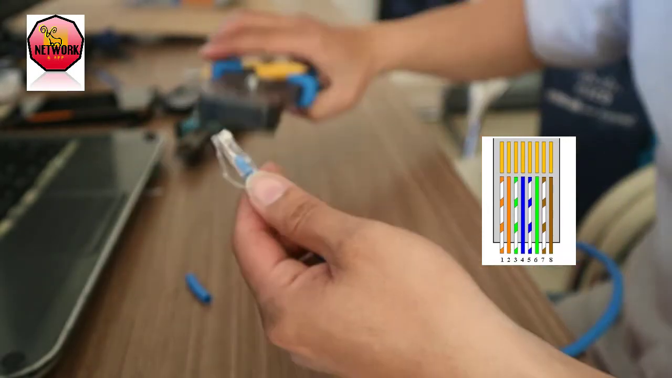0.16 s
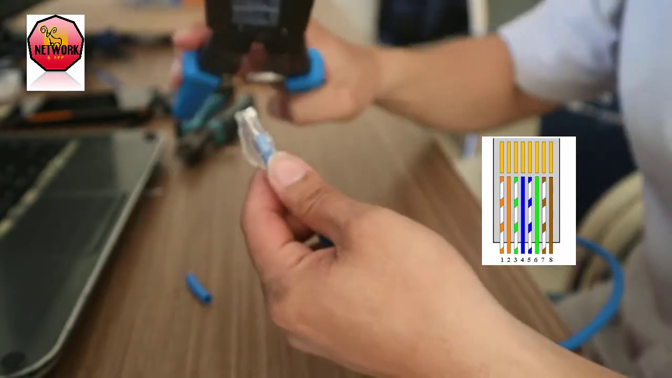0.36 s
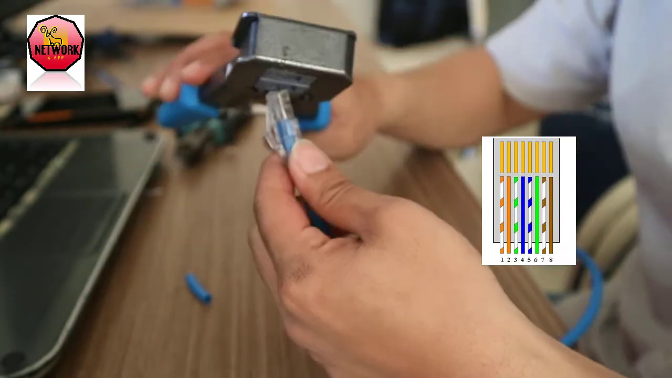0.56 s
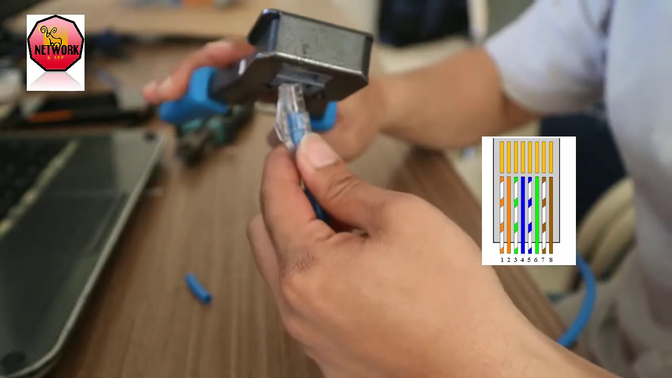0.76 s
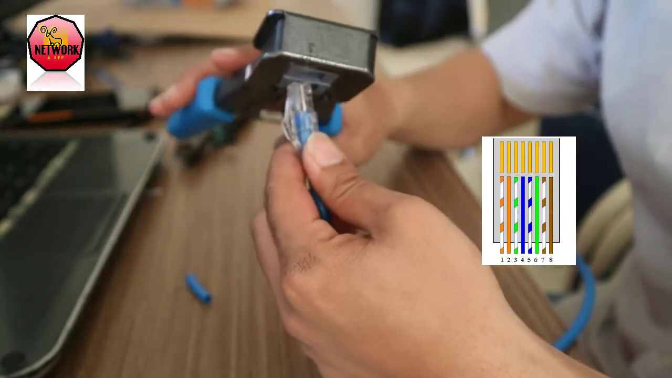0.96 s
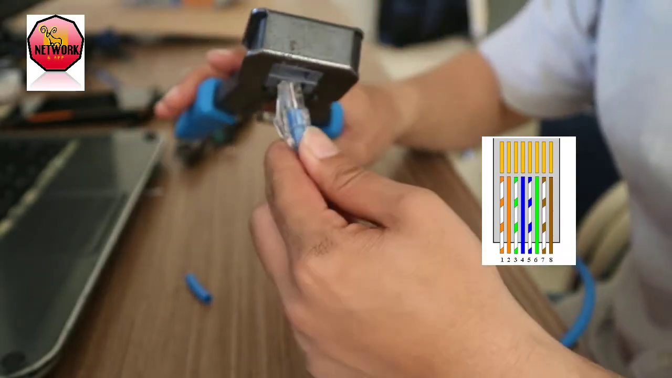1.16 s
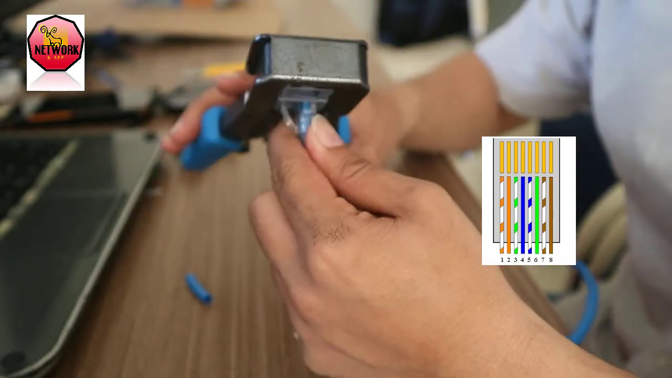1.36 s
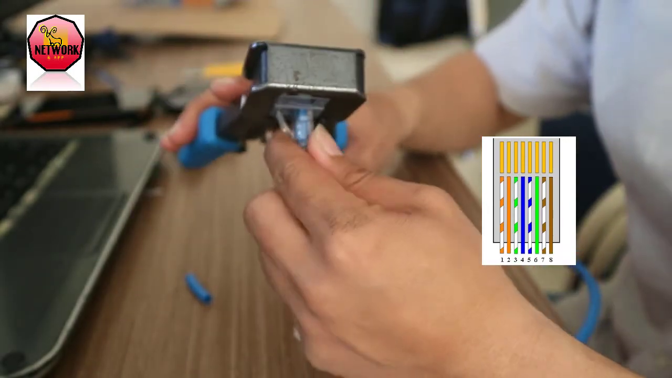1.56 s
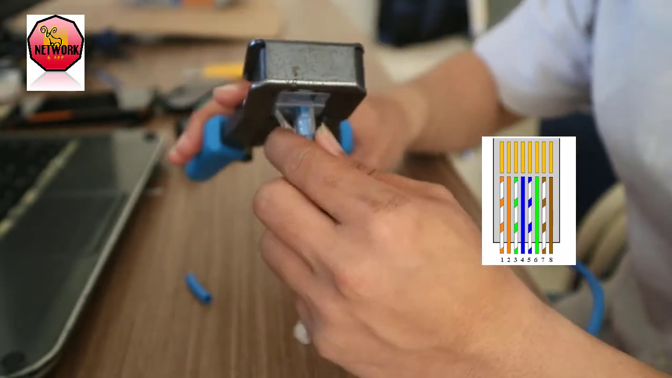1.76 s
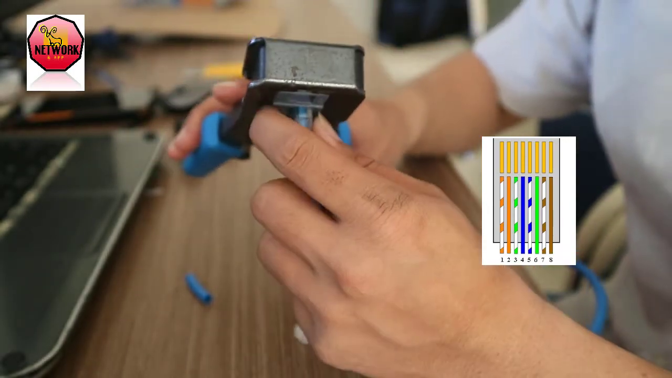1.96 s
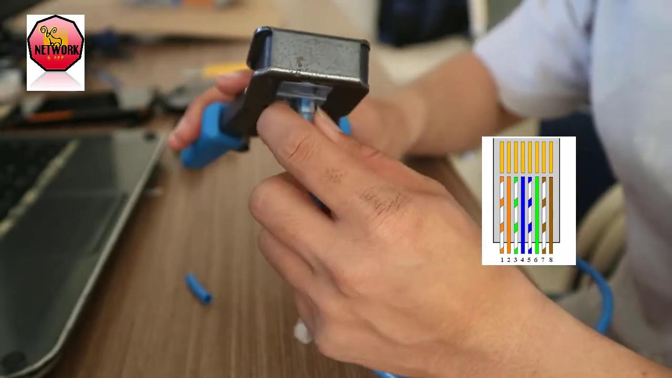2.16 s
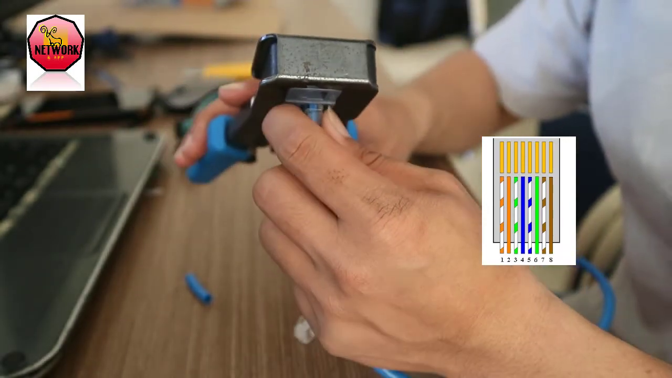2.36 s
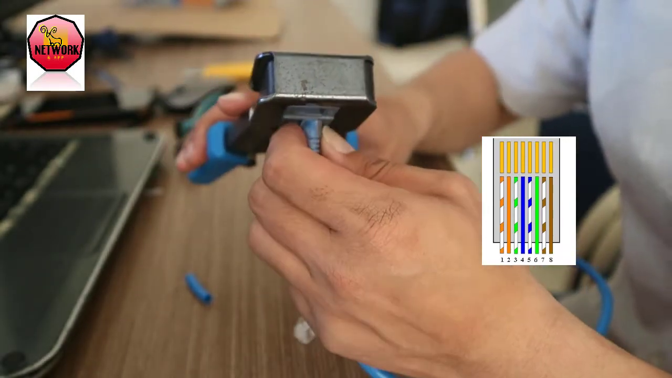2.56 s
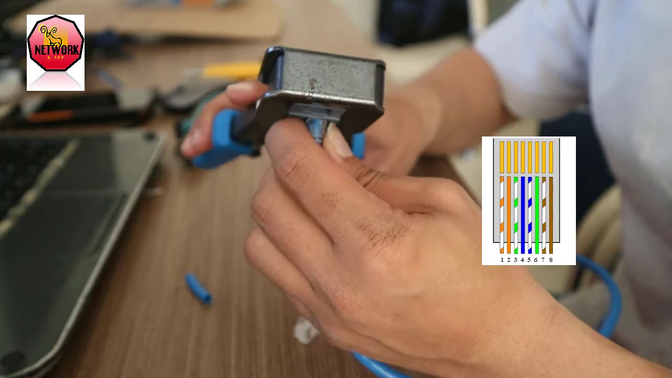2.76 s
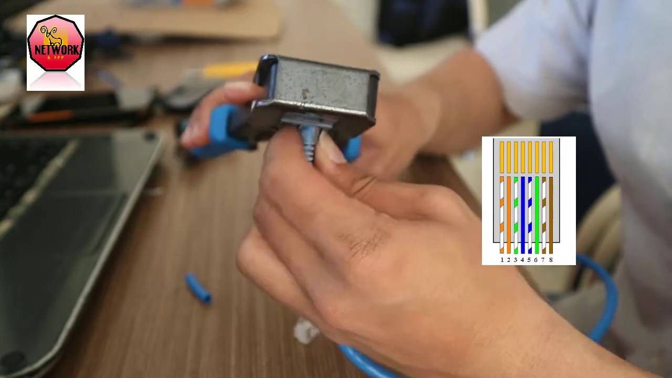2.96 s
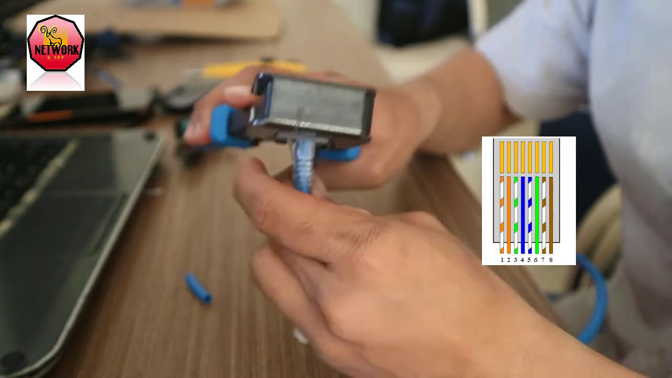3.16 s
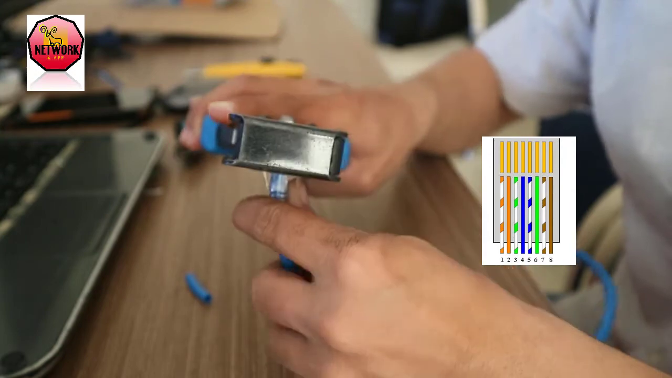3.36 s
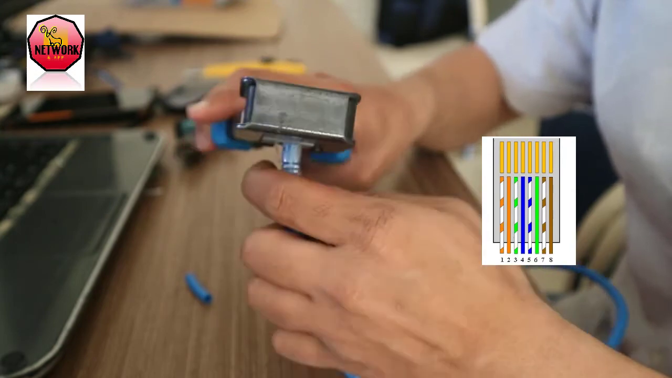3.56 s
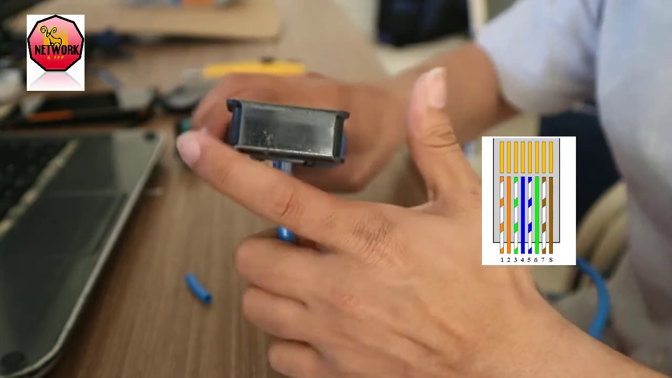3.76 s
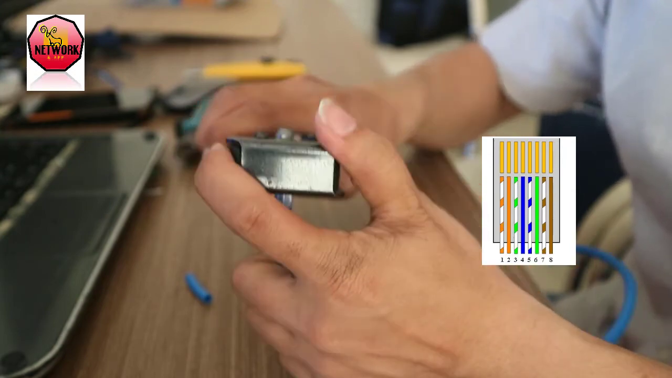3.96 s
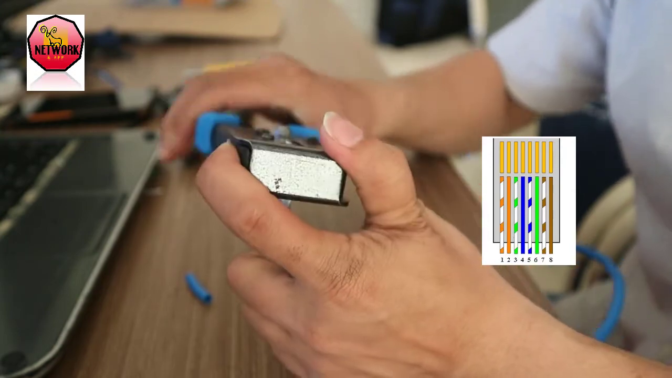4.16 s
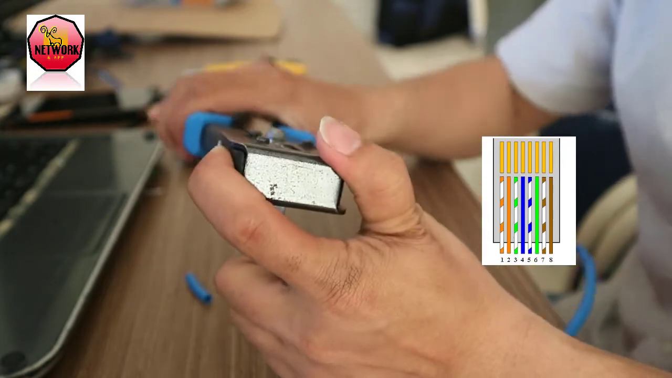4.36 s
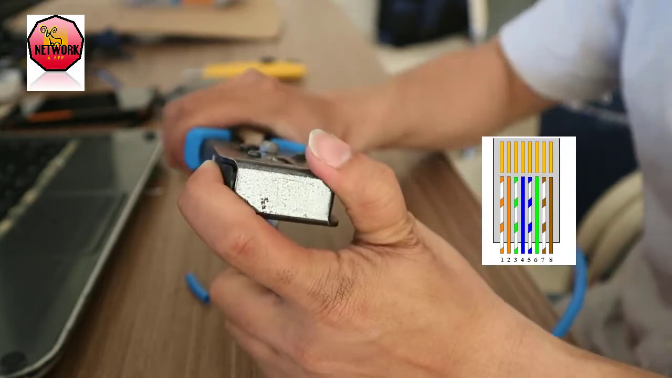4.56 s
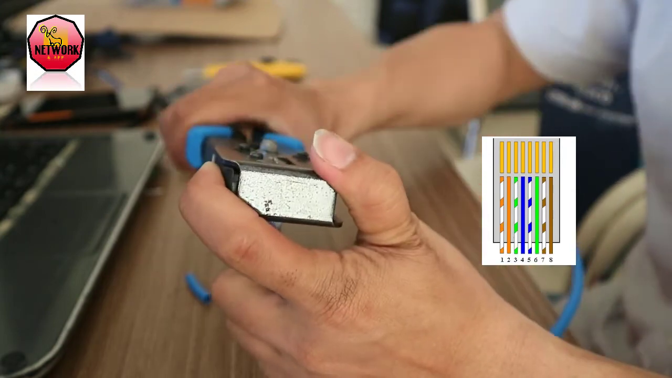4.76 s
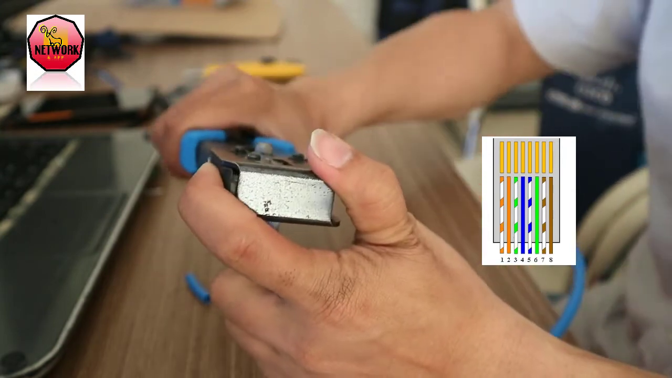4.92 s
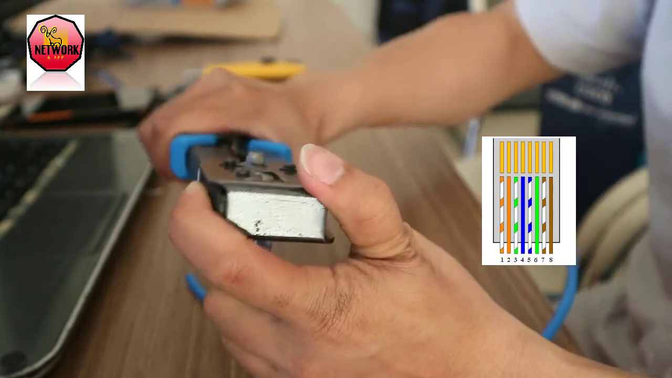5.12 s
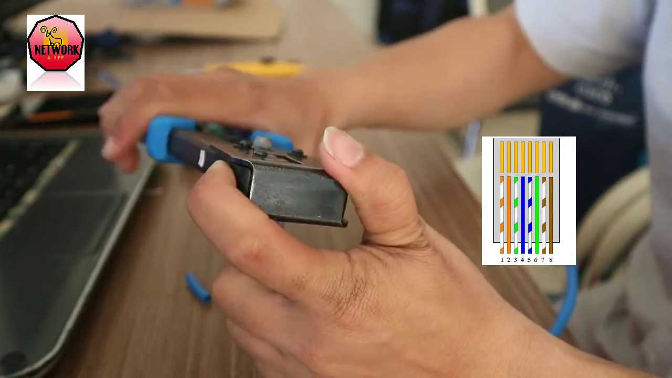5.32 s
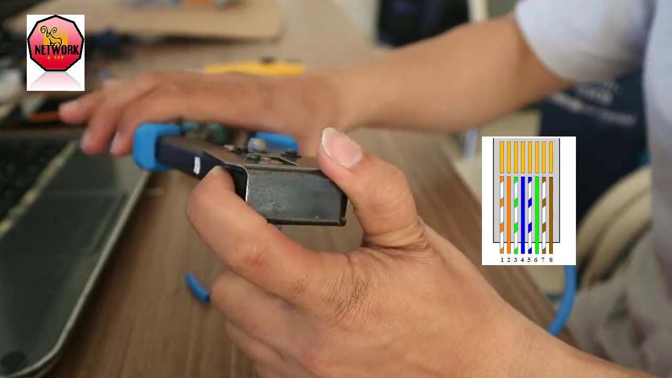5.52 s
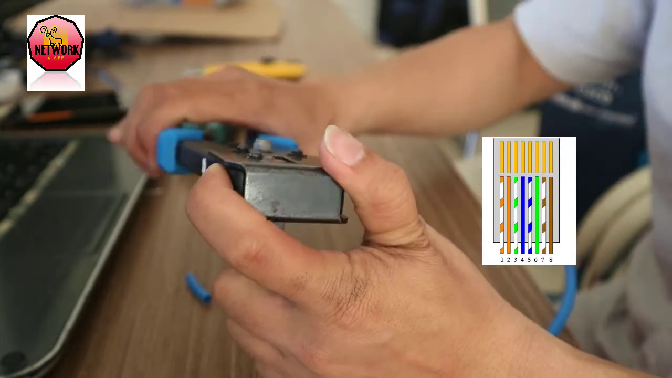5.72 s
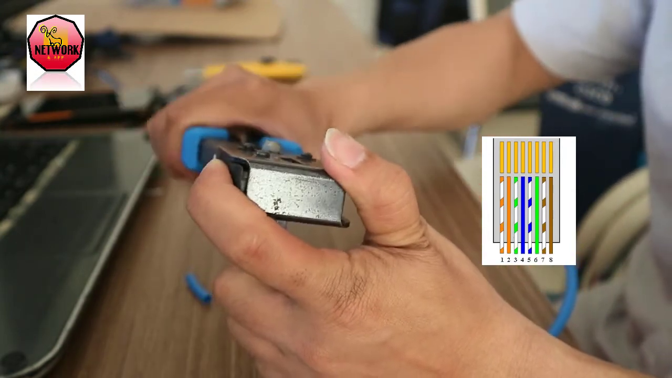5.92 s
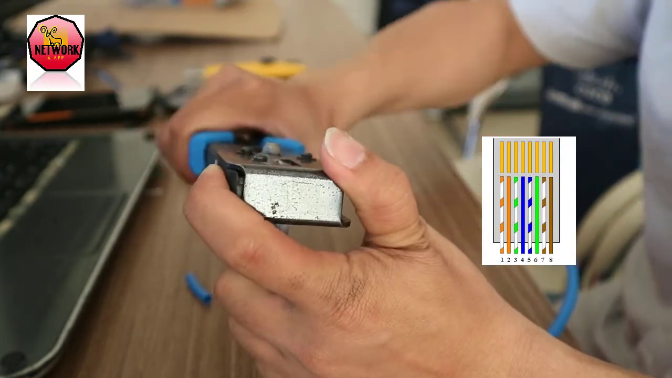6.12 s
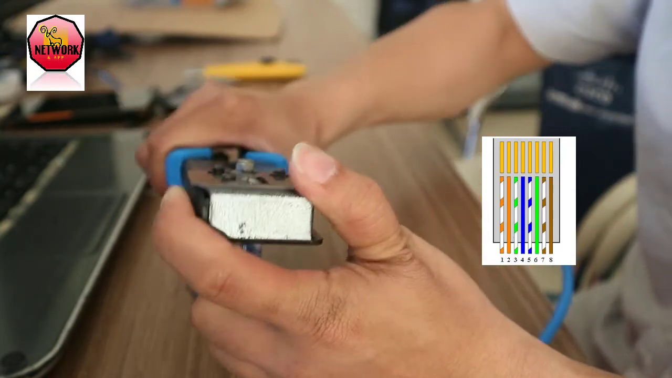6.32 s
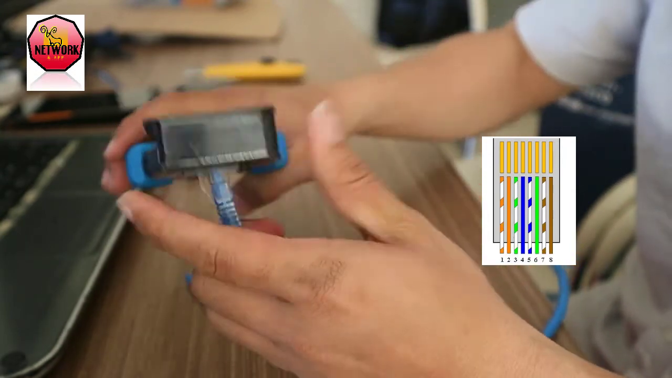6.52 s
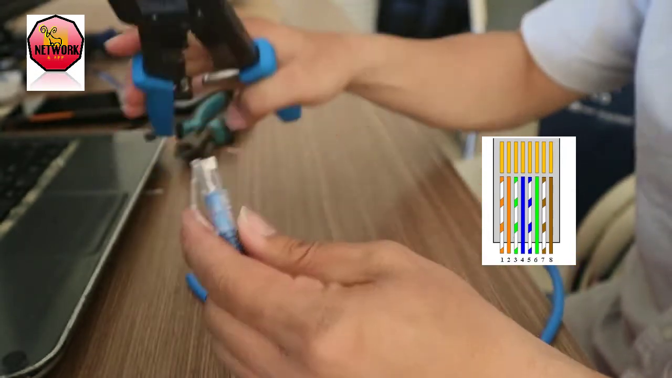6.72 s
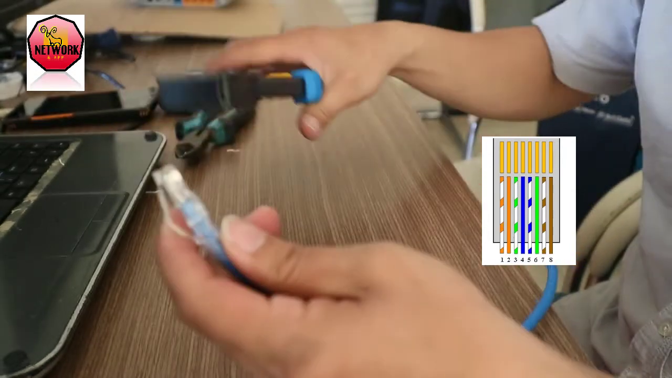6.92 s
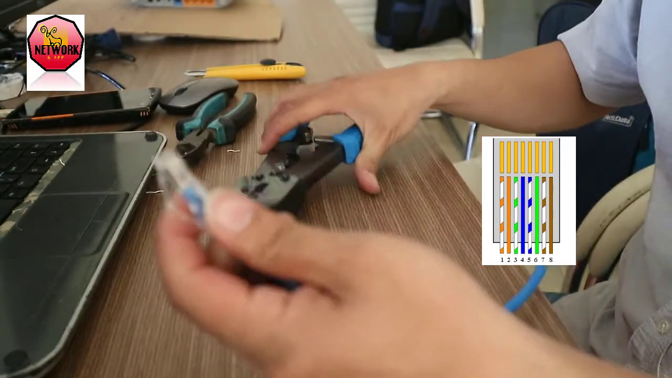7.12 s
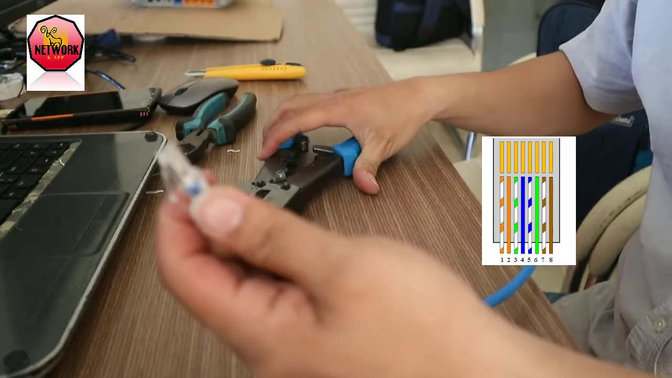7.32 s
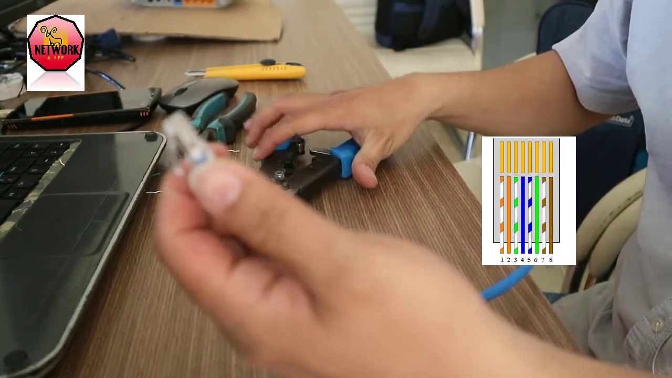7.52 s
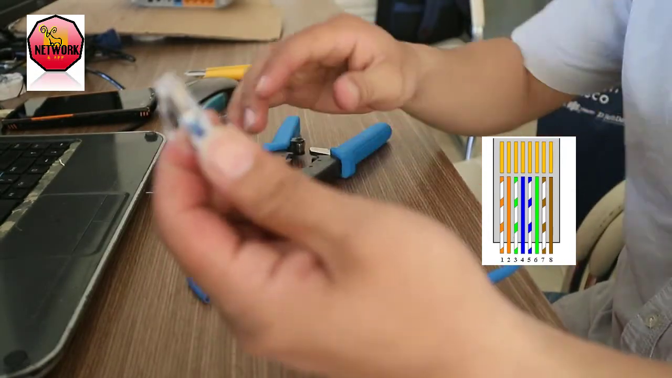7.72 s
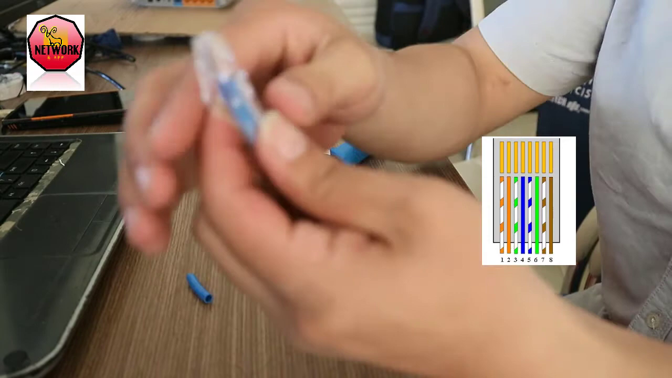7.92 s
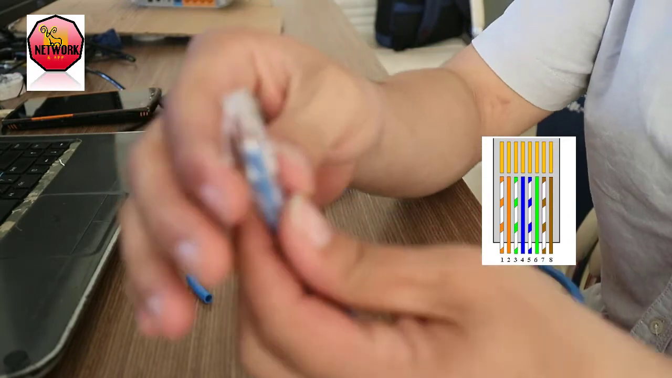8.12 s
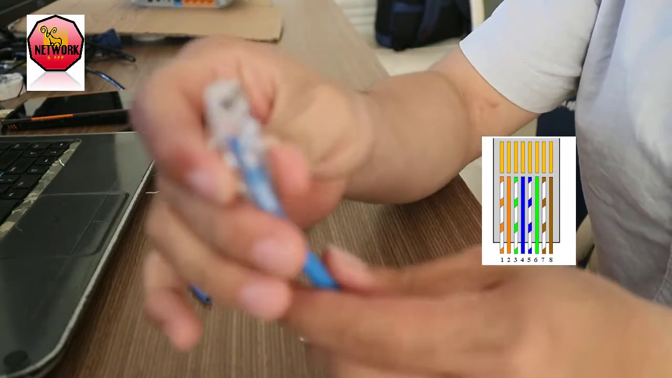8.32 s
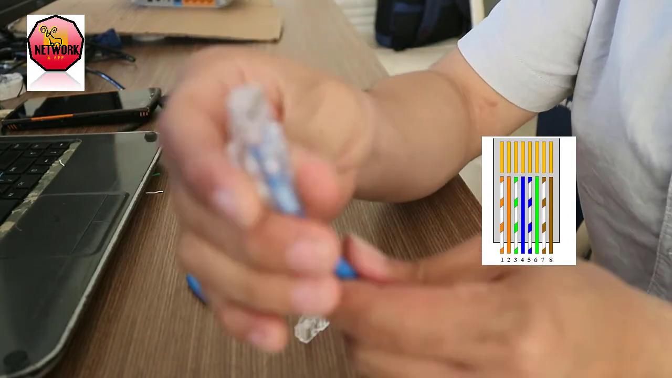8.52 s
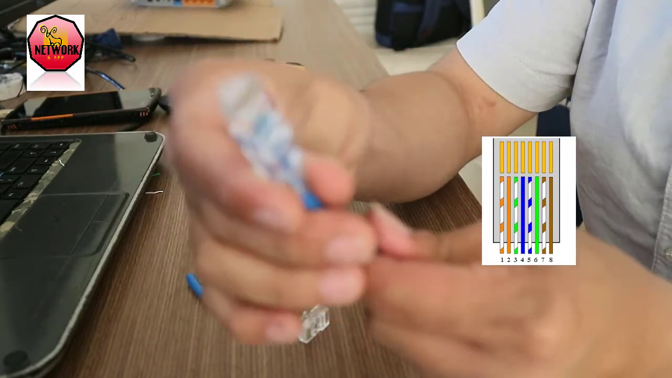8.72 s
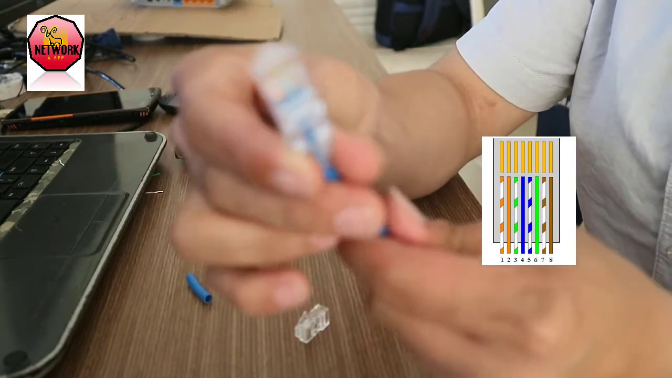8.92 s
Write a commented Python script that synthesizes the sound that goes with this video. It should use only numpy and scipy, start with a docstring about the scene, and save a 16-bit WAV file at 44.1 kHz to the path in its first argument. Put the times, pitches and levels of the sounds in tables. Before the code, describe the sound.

Over a steady low ventilation rumble, scattered light ticks come from a plastic plug and fingers touching a steel crimping tool. Its ratchet then clicks sharply through three squeezes, evenly at first and later in fast rattles, leaving a faint ring from the spring. Finally the tool knocks down onto a wooden desk. The microphone is close, and the small hard room adds a short echo.

```python
"""Crimping a plug at a desk

Close up on a wooden desk, a ratchet crimping tool is lifted, takes a plastic plug, is squeezed shut
three times and is laid down. Each ratchet tooth ticks and rings the steel jaws; a coil spring sings
faintly after. A small hard room answers over low ventilation rumble. Two microphone ports, near the tool."""
import sys
import numpy as np
from scipy import signal
from scipy.fft import rfft, irfft
from scipy.io import wavfile
from scipy.ndimage import uniform_filter1d

SR = 44100
rng = np.random.default_rng(int(sys.argv[2]) if len(sys.argv) > 2 else 0)


def master(y):
    """Save y as 16-bit WAV."""
    cut = np.clip(np.atleast_2d(y).T, -1, 1)
    pcm = np.round(cut * 32767)  # scale
    wavfile.write(sys.argv[1], SR, pcm.astype(np.int16))


N = 396018
LEAD = 4410  # samples of run-up, so a knock can ring into the opening

# Room tone. Each row: frequency in Hz, relative density in dB.
AIR_COLOUR = [(12, -30.5), (20, -24), (32, -20.5), (48, -25.5), (62, -4.5), (125, -4), (211, -3),
              (302, -10.5), (386, -15), (632, -19), (766, -18.5), (1090, -25.5), (1480, -25), (2560, -33),
              (3190, -37), (4680, -44), (8500, -54.5), (12000, -66)]
# Swell of the rumble. Each row: time in seconds, lift in dB near 71 Hz, lift in dB near 170 Hz.
RUMBLE_SWELL = [(0.0, 0.5, -3.5), (8.98, 15, 0.5)]
# Drones in the rumble. Each row: centre and width in Hz, start and end in seconds, level in dB.
DRONES = [(70, 5.9, 2.5, 10, -71), (109, 5, -11, 10, -68), (209, 0.91, -6, 8.1, -60.5),
          (130.35, 3, 5, 5, -61), (164.6, 3.4, 5, 7.9, -58.5), (234.4, 2.7, 5.5, 10, -57.5),
          (381.5, 2.3, 3, 9.4, -68.5), (229.7, 4, 8.5, 7, -54.5), (197.5, 3.97, 9.5, 10, -54),
          (129.45, 3.6, 3.5, 10, -59.5)]
# Stereo width at the microphone, for room tone and for clicks and reverberation.
# Each row: frequency in Hz, difference of the ports against their sum in dB.
AIR_WIDTH = [(60, -32.5), (110, -36), (200, -33), (380, -12.5), (700, -16.5), (1290, -9), (2380, -3),
             (4400, 1), (8120, 4.5), (15000, 18)]
PORT_WIDTH = [(60, -22), (110, -28.5), (200, -30.5), (380, -20.5), (700, -20), (1290, -19.5), (2380, -13),
              (4400, -3.5), (8120, 4), (11500, 6), (15000, -5.5)]
# Echoes off the desk and near walls. Each row: delay in seconds, level in dB.
ECHOES = [(.0028, -19), (.009, -18), (0.0118, -23.5), (0.02, -25)]
# The room's tail. Each row: frequency in Hz, t60 in seconds, relative level in dB.
ROOM_TAIL = [(45, 0.55, -21), (100, 1, -2.5), (297, 0.8, 4), (790, 0.58, 6.5), (1500, 0.5, 2),
             (2120, 0.56, 0), (3000, .63, 1), (5600, 0.47, 5.5), (7800, 0.49, 4.5), (9700, 0.38, 5),
             (11500, 0.18, -5), (14380, 0.12, -12.5)]
# Modes of the desk board, the steel frame lying on it, the spring, the plug and the jaws.
# Each row: frequency in Hz, relative level in dB, t60 in seconds.
BOARD_MODES = [(64.7, -30.5, 0.87), (99.45, -19, 1), (155, -13, 0.28), (266.4, -14.5, 0.11),
               (275.2, -17.5, 0.3), (297, 15, 0.015), (334, -13, 0.099), (392, -9, 0.049), (515, -7, 0.088)]
FRAME_MODES = [(961, 5, 0.016), (1220, 9.5, 0.011), (1442, 4, 0.01), (2180, 5.5, 0.013), (2470, 15, 0.0066),
               (2947, 17.5, .007), (3300, 3, .004), (3554, -10.5, 0.0116), (3980, -10, 0.016),
               (4450, -10, 0.017), (5470, -19, 0.0114), (6860, -22, 0.011), (7930, -21.5, 0.0083)]
SPRING_MODES = [(947.5, 0.3, 2.6), (1890, 0.3, 2.2), (3644, 0.3, 1.0), (2805, -12, .9), (4151, -12, .9),
                (4673, -10, .9)]
PLUG_MODES = [(3450, 6, .007), (3900, 5, .009), (4080, -4.5, .007), (5340, -10, .006), (6200, -2.5, 0.007),
              (6880, -3.5, .008), (7800, -12.5, .008)]
JAW_MODES = [(3330, -6.5, 0.066), (3760, -3.5, 0.015), (4460, -10.5, 0.024), (4990, -10.5, 0.014),
             (6280, -1.5, 0.0051), (7170, -2.5, 0.008)]
# Colours of the frame's clack at the walls, loose parts on wood, and a click's crack and high tick.
# Each row: frequency in Hz, relative level in dB.
CLACK_COLOUR = [(600, -21.5), (930, -3), (1300, -3.5), (1750, -12), (2200, -0.5), (2700, 0), (3050, -1),
                (3400, -9.5), (3900, -18.5), (6000, -34.5), (10000, -46)]
CLATTER_COLOUR = [(200, -30), (450, -11.5), (660, 1), (900, 1.5), (1200, 1.5), (2000, 5), (3000, -6.5),
                  (4000, -21), (8000, -38.5)]
CRACK_COLOUR = [(150, -27), (600, -27.5), (1000, -8.5), (1500, -9), (2200, -2), (3000, -2.5), (5000, -8.5),
                (7500, -15), (8800, -24.5), (16000, -36)]
TICK_COLOUR = [(7000, -45), (9000, -14.5), (10500, -6), (12300, -5.5), (14300, -0.5), (15600, -3),
               (16200, -32)]
# The tool knocks the desk. Each row: start in seconds, then board, thud, frame and clatter in dB.
KNOCKS = [(-.03, -22, -46, -49, -13.5), (7.277, -35.5, -28, -47.5, -24.5),
          (7.4133, -12.5, -45.5, -10.5, -10)]
# Jolts to the spring. Each row: start in seconds, then fundamental, octave and upper modes in dB.
JOLTS = [(4.529, -56.5, -59.5, -75.5), (4.64, -52, -54, -77.5), (4.82, -51, -60.5, -89),
         (4.91, -58, -76, -72.5), (5.44, -54.5, -45, -61), (5.91, -55, -59.5, -72),
         (6.182, -58.5, -50.5, -70.5), (6.52, -60, -56.5, -46)]
# The tool turns in the hand. Each row: time in seconds, gain of the spring's overtones in dB.
HAND_TURN = [(6.66, -14), (6.74, -11), (6.83, 4.5), (6.95, 1.5), (7.04, -14), (7.17, 2.5), (7.26, -6.5)]
# Plug and fingers on the tool. Each row: start in seconds, level in dB, first and second ring in Hz,
# second ring and crack in relative dB, swell of the first ring in ms.
TAPS = [(0.326, -56, 1520, 3700, 6, -18, 0.56), (.335, -38.5, 1820, 2390, -14, -18, 2),
        (0.453, -30.5, 1950, 4300, -11, -8, 0.9), (0.4563, -31.5, 1740, 4860, -12, -10, 2.05),
        (0.5976, -30, 1880, 3330, -2.5, -18.5, 0.48), (.707, -51, 1730, 3300, -8, -16, 1.3),
        (.722, -55, 1800, 3400, -9, -16, 1.7), (.74, -58, 1690, 3470, -4, -12, 1.3),
        (0.801, -54, 1930, 3400, -4, -11, 1.3), (.813, -56, 1900, 3400, -3, -16, 1.2),
        (.829, -44.5, 1810, 3170, -8, -20, 1.7), (0.919, -39.5, 1900, 3470, -2, -22, 0.84),
        (1.193, -52, 1170, 2200, -4, -21, 1.6), (1.3714, -33, 1820, 3130, -3, -21, 0.59),
        (1.417, -38.5, 1500, 3230, 2.5, -9, 1.5), (1.4357, -33, 1770, 3200, 8, -1, 0.95),
        (2.388, -37.5, 1920, 3300, 5, 11.5, 0.98), (2.567, -41.5, 1200, 3230, -2.5, -14, 1.2),
        (3.13, -59.5, 1700, 3180, 11, -1, 2.4), (3.138, -55, 2100, 3000, 2, -4, 1.6),
        (3.342, -67, 1400, 3420, -1, 4, 1), (3.497, -55, 1260, 3890, 7, 2, 1.5),
        (3.702, -39.5, 1740, 4840, -23, -9.5, 1.7), (3.778, -48, 1990, 1200, -2, -12, 1.7),
        (3.8013, -61, 1930, 3300, 0, 3, 1.2), (3.871, -52.5, 2020, 3800, -5, 2.5, 3.5),
        (3.925, -51.5, 2000, 3930, -10, -6, 2.8)]
# Tone of each run of ratchet clicks, or of a lone click. Each row: start in seconds; jaw modes, crack,
# tick and push in dB; third ring in Hz and dB; swell of the first ring in ms; lingering mode in Hz and dB.
# Levels are against the tooth.
CLICK_TONES = [(3.9, -23.5, -6.5, -13, -30, 1560, -11, 1.49, 4280, -26.5),
               (4.5, -12, -3, -12, -19.5, 6070, -16.5, 1.32, 3000, -24.5),
               (5.15, -24.5, 1, -21, -38.5, 4200, -12, 0.81, 3516, -31.5),
               (5.3, -20, 1, -11, -41.5, 1290, -13.5, 1.07, 3000, -26),
               (5.7, -26, -2.5, -13, -38, 4900, -13.5, 1.23, 2180, -22.5),
               (5.82, -19.5, -8, -16.5, -28.5, 3350, -17, 1.37, 4878, -31.5),
               (5.94, -19.5, -1.5, -12, -30.5, 4380, -11, 1.4, 4410, -32),
               (6.15, -16, -1, -4.5, -27, 1120, -12, 1.3, 2900, -29.5),
               (6.4, -25.5, -2, -12.5, -46, 1150, -14.5, 1.22, 4078, -39),
               (6.6, 6, 9.5, 2, -7, 1530, -11, 1.4, 3280, -32),
               (6.64, -30, -0.5, -30, -9, 600, -0.5, 1.9, 3300, -37)]
# Ratchet teeth. Each row: start in seconds, level in dB, first and second ring in Hz,
# second ring in relative dB.
TEETH = [(3.973, -10.5, 1950, 4470, -12), (3.997, -10.5, 1960, 4330, -14.5), (4.029, -12, 2020, 3240, -10),
         (4.5286, -12, 2160, 3200, -7), (4.583, -12, 2040, 3000, -23), (4.6295, -13.5, 2100, 3020, -12.5),
         (4.6718, -13, 2100, 3460, -14), (4.7183, -12, 2110, 3540, -19.5), (4.765, -12, 2210, 3200, -9.5),
         (4.82, -13, 2230, 3560, -8.5), (4.8618, -12.5, 2190, 3470, -3.5), (4.909, -10, 2260, 3720, -13.5),
         (5.2077, -39.5, 2530, 5000, -3.5), (5.2319, -28, 2670, 3600, -2.5), (5.311, -18, 2730, 3900, -4.5),
         (5.323, -21, 2530, 3500, -0.5), (5.3331, -16.5, 2210, 3180, -5.5), (5.3425, -20, 2160, 3060, -1),
         (5.3529, -18.5, 2540, 3420, -8.5), (5.368, -20, 2440, 3160, -5.5), (5.389, -23, 2280, 2940, -7.5),
         (5.408, -19.5, 2000, 3000, -4.5), (5.422, -21, 2220, 2980, -6), (5.4357, -18.5, 2200, 3080, -3.5),
         (5.443, -21, 2170, 3250, -5.5), (5.4519, -30, 2450, 3200, -6.5), (5.4637, -27, 1990, 3140, -7.5),
         (5.7557, -23, 2180, 3540, -8.5), (5.79, -40, 2500, 1900, -3), (5.8303, -6, 2090, 4730, -10),
         (5.837, -6, 2040, 4760, -8), (5.8459, -9, 2200, 4130, -7.5), (5.8548, -7.5, 2020, 4660, -10.5),
         (5.864, -9.5, 2100, 4070, -6), (5.872, -9, 2170, 4120, -9.5), (5.8837, -8, 2270, 2900, -13.5),
         (5.9082, -7.5, 2220, 4120, -14.5), (5.9557, -15.5, 1980, 5300, -7.5),
         (6.0229, -14, 2160, 3040, -4), (6.091, -13, 2190, 3180, -7), (6.1788, -12, 2740, 2130, -2),
         (6.4127, -40.5, 2580, 4570, 0.5), (6.44, -39.5, 1710, 3300, -4),
         (6.4655, -14.5, 2720, 4000, -10.5), (6.4716, -17.5, 2610, 4040, -12),
         (6.4783, -15.5, 1870, 2600, -5), (6.487, -13, 1940, 2660, -11), (6.4957, -17, 2070, 2780, -9.5),
         (6.502, -18, 2060, 2900, -9), (6.509, -16.5, 1940, 2680, -10.5), (6.514, -15, 2480, 1870, 2),
         (6.5166, -18, 2060, 3130, -7.5), (6.5201, -18.5, 2070, 3330, -9.5),
         (6.5232, -14, 2350, 1810, -2.5), (6.532, -24, 3000, 2092, -5), (6.54, -27, 2200, 3200, -10),
         (6.5523, -24, 1960, 3597, -3.5), (6.56, -33, 1780, 3000, -19), (6.566, -32.5, 1707, 3000, -17.5),
         (6.631, -29.0, 3280, 4300, -17), (6.645, -33.5, 1103, 1690, 0)]


def amp(db):
    """Decibels to gain."""
    return 10 ** (np.asarray(db) / 20)


def curve(points, hz, column=1):
    """A column of a table, interpolated along log frequency."""
    table = np.transpose(points)
    return np.interp(np.log(hz + 1), np.log(table[0] + 1), table[column])


def coloured(x, points):
    """Shapes a spectrum by a table of Hz and dB."""
    size = x.shape[-1]
    return irfft(rfft(x) * amp(curve(points, np.fft.rfftfreq(size, 1 / SR))), size)


def add(mix, s, sound):
    """Mixes a sound in at s seconds. Blows have three rows: port sum, port difference, wall send."""
    part = mix[:, LEAD + round(s * SR):][:, :sound.shape[1]]
    part += sound[:, :part.shape[1]]


def modes(table, seconds, rise_s):
    """A struck body rings as a sum of dying sines."""
    t = np.arange(round(seconds * SR)) / SR
    ringing = sum(amp(db - 60 * t / t60) * np.sin(2 * np.pi * hz * t) for hz, db, t60 in table)
    return ringing * (1 - np.exp(-t / rise_s))


def damped_ring(t, hz, rise_s, phase):
    """A heavily damped ring that swells to its peak at rise_s."""
    u = t / rise_s
    return (u * np.exp(1 - u)) ** 4.57 * np.sin(2 * np.pi * (hz * t + phase))


def wall_pulse(sound, colour, delay_samples):
    """A coloured pulse carries a sound's energy to the walls."""
    pulse = coloured(signal.unit_impulse(sound.shape[-1], delay_samples), colour)
    return pulse * np.linalg.norm(sound) / np.linalg.norm(pulse)


def burst(noise, colour, decay_s, rise_s):
    """A snap of coloured noise, at the ports and at the walls."""
    t = np.arange(noise.shape[1]) / SR
    close = coloured(noise, colour)
    close = close / np.std(close[0]) / 2 * (1 - np.exp(-t / rise_s)) ** 2 * np.exp(-t / decay_s)
    far = wall_pulse(close, colour, 128) / np.sqrt(2)
    return np.array([close[0], coloured(close[1], PORT_WIDTH), far])


def room_tone(level_db=-46):
    """Ventilation and distant traffic: steady hiss, with a rumble that swells and drifts in patches."""
    frames, hz = N // 1024 + 6, np.fft.rfftfreq(4096, 1 / SR)
    t = np.arange(frames) * 1024 / SR
    sum_re, sum_im, side_re, side_im, patches = rng.standard_normal((frames, 2049, 5)).T
    patches = uniform_filter1d(uniform_filter1d(patches, 3, 0), 8, 1)
    steady_db = curve(AIR_COLOUR, hz)
    field_db = steady_db[:, None] + 2.4 * patches / patches.std()
    s, low_db, middle_db = np.transpose(RUMBLE_SWELL)
    for centre_hz, octaves, db in ((71, 0.12, low_db), (170, 1, middle_db)):
        band = np.exp(-(np.log2((hz + 1) / centre_hz) / octaves) ** 2)
        field_db += np.outer(band, np.interp(t, s, db))
    side = (side_re + 1j * side_im) * amp(curve(AIR_WIDTH, hz))[:, None]
    spectra = np.array([sum_re + 1j * sum_im, side]) * amp(field_db)
    air = signal.istft(spectra, nperseg=4096, noverlap=3072)[1][:, :N]
    return amp(level_db) * air / (2 * np.linalg.norm(amp(steady_db)))


def drones(fade_s=0.13):
    """Narrow wavering bands of noise fade in and out of the rumble."""
    t, hz, out = np.arange(N) / SR, np.fft.rfftfreq(N, 1 / SR), np.zeros(N)
    for centre_hz, width_hz, start, end, db in DRONES:
        band = irfft(rfft(rng.standard_normal(N)) / (1 + (2 * (hz - centre_hz) / width_hz) ** 2), N)
        fade = np.clip(np.minimum(t - start, end - t) / fade_s, 0, 1)
        out += amp(db) * band / band.std() * fade
    return out


def room(blows, wet_db):
    """Hard walls close by: a few echoes, then three diffuse tails that take turns, dying band by band."""
    size, near = blows.shape[1], np.zeros(SR // 20)
    for s, db in ECHOES:
        near[round(s * SR)] = amp(db)
    out = signal.oaconvolve(blows[:2], near[None])[:, :size]
    turn = 2 * np.pi * 2.3 * np.arange(size) / SR
    onset = np.clip(np.arange(SR) / SR / 0.0081 - .3, 0, 1)
    for k in range(3):
        hz, t, bands = signal.stft(rng.standard_normal((2, SR)), SR, nperseg=256)
        bands *= amp(curve(ROOM_TAIL, hz, column=2)[:, None] - 60 * t / curve(ROOM_TAIL, hz)[:, None])
        tail = signal.istft(bands, SR, nperseg=256)[1][:, :SR] * onset
        tail = np.array([tail[0], amp(-1) * coloured(tail[1], PORT_WIDTH)]) / np.sqrt(SR / 20)
        send = blows[2] * np.sqrt(2 / 3) * np.cos(turn + k * np.pi / 3)
        out += amp(wet_db) * signal.fftconvolve(send[None], tail, axes=1)[:, :size]
    return out


def desk_knocks():
    """The board booms under a dull thud, the steel frame clacks and loose parts clatter."""
    mix = np.zeros((3, N + LEAD))
    board = modes(BOARD_MODES, seconds=1, rise_s=0.00245)
    thud = damped_ring(np.arange(4096) / SR, hz=158, rise_s=0.02, phase=0)
    frame = modes(FRAME_MODES, seconds=.05, rise_s=0.0014)
    frame_far = amp(-0.5) * wall_pulse(frame, CLACK_COLOUR, 256)
    for s, board_db, thud_db, frame_db, clatter_db in KNOCKS:
        clatter = burst(rng.standard_normal((2, 2048)), CLATTER_COLOUR, decay_s=0.0042, rise_s=0.00074)
        add(mix, s, amp(board_db) * np.outer([-1, -.03, 1], board))
        add(mix, s, amp(thud_db) * np.outer([1, .03, 1], thud))
        add(mix, s, amp(frame_db) * np.array([frame, 0.15 * frame, frame_far]))
        add(mix, s, amp(clatter_db) * clatter)
    return mix


def spring():
    """Each jolt of the handles sets the coil singing anew; its overtones waver as the tool turns."""
    mix = np.zeros((2, N + LEAD))
    groups = SPRING_MODES[:1], SPRING_MODES[1:2], SPRING_MODES[2:]
    ends = [row[0] for row in JOLTS[1:]] + [N / SR]
    for (s, *levels), end in zip(JOLTS, ends):
        low, octave, upper = (amp(db) * modes(group, end - s, 0.0054) for db, group in zip(levels, groups))
        release = np.minimum(np.arange(len(low))[::-1] / 200, 1)
        add(mix, s, np.array([low, octave + upper]) * release)
    fundamental, overtones = mix[:, LEAD:]
    return fundamental + overtones * amp(np.interp(np.arange(N) / SR, *np.transpose(HAND_TURN)))


def click(hz, second_hz, second_db, table, modes_db, crack_db, tick_db, push_db,
          third_hz, third_db, rise_ms, linger_hz, linger_db, pan_db):
    """One small blow: tick and crack, three damped rings and the struck part's modes over a dull push."""
    t, body_t, rise_s = np.arange(2048) / SR, np.arange(8192) / SR, rise_ms / 1000
    noise, phase = rng.standard_normal((4, 2048)), rng.random(3)
    side = (amp(pan_db) - 1) / (amp(pan_db) + 1)
    first = damped_ring(t, hz, rise_s, phase[0])
    second = amp(second_db) * damped_ring(t, second_hz, 1.1 * rise_s, phase[1])
    third = amp(third_db) * damped_ring(t, third_hz, 1.2 * rise_s, phase[2])
    push = amp(push_db) * damped_ring(t, hz=330, rise_s=0.0013, phase=phase[0])
    crack = amp(crack_db) * burst(noise[:2], CRACK_COLOUR, decay_s=0.0044, rise_s=0.00036)
    tick = amp(tick_db) * burst(noise[2:], TICK_COLOUR, decay_s=0.0028, rise_s=0.00036)
    attack = crack + tick + np.outer([1, side, 0], first + push)
    attack += np.outer([1, side, amp(-5.5)], second + third)
    attack[2] += amp(-2.5) * damped_ring(t, hz, .8 * rise_s, phase[0])  # shorter, weaker at the walls
    # Each blow excites the modes unevenly in pitch and level.
    uneven = [(mode_hz * (1 + .006 * rng.standard_normal()), db + 2 * rng.standard_normal(), t60)
              for mode_hz, db, t60 in table]
    body = amp(modes_db) * modes(uneven, 8192 / SR, rise_s=0.00071)
    linger = modes([(linger_hz, linger_db, 0.11)], 8192 / SR, rise_s=.0012)
    far = amp(5) * body * np.exp(-body_t / 0.0067) + amp(-4.5) * linger
    sound = np.array([body + linger, side * (body + linger), far])
    sound[:, :len(t)] += attack
    return sound


def plug_taps():
    """Plug and fingers tap the tool; the harder the crack, the brighter the tap."""
    mix = np.zeros((3, N + LEAD))
    for s, db, *rings, crack_db, rise_ms in TAPS:
        tap = click(*rings, PLUG_MODES, modes_db=crack_db - 3, crack_db=crack_db,
                    tick_db=1.2 * crack_db - 10.5, push_db=-14.5, third_hz=1166, third_db=crack_db - 6.5,
                    rise_ms=rise_ms, linger_hz=3700, linger_db=crack_db - 17, pan_db=1.8)
        add(mix, s, amp(db) * tap)
    return mix


def ratchet():
    """The pawl drops over each tooth and rings the jaws; the clicks' tone changes from run to run."""
    mix = np.zeros((3, N + LEAD))
    for s, db, *rings in TEETH:
        tone = [row for start, *row in CLICK_TONES if start <= s][-1]
        add(mix, s, amp(db) * click(*rings, JAW_MODES, *tone, pan_db=1.7))
    return mix


def scene():
    """Tool and desk up close, the room behind; the ports' sum and difference become left and right."""
    tool, desk = ratchet() + plug_taps(), desk_knocks()
    walls = room(tool + 1.325 * desk, wet_db=-8)
    mid, side = ((tool + desk)[:2] + walls)[:, LEAD:] + room_tone()
    mid += spring() + drones()
    return np.array([mid + side, mid - side])


def record(dry):
    """The microphone rolls off the bass and the recorder limits the top."""
    bass_cut_hz, top_hz = 16, 16850
    lean = signal.sosfilt(signal.butter(2, bass_cut_hz, "high", fs=SR, output="sos"), dry)
    band_limit = signal.firwin(511, top_hz, window=("kaiser", 9), fs=SR)
    return signal.oaconvolve(lean, band_limit[None], "same")


dry = scene()
out = record(dry)
master(out)
```